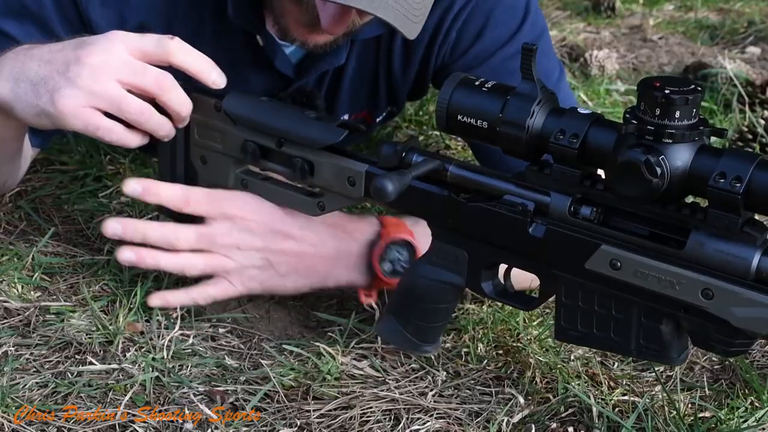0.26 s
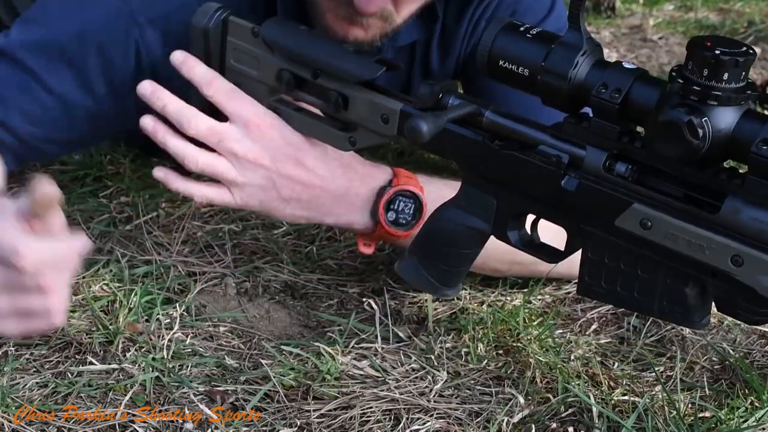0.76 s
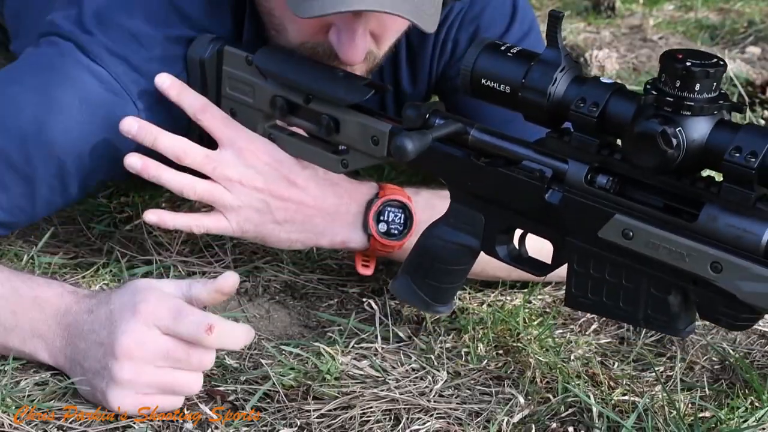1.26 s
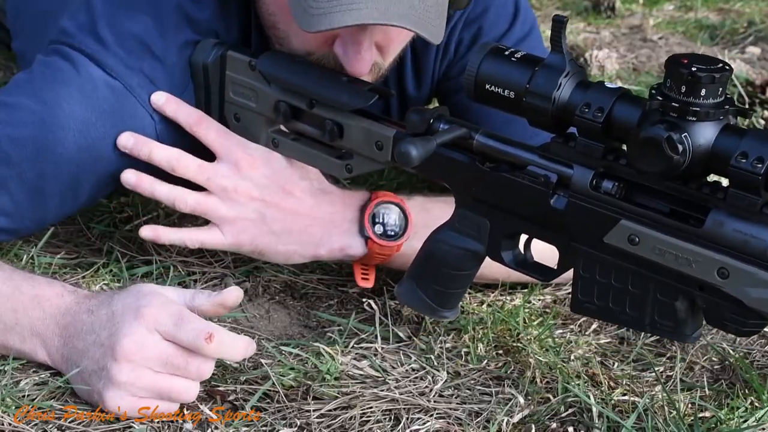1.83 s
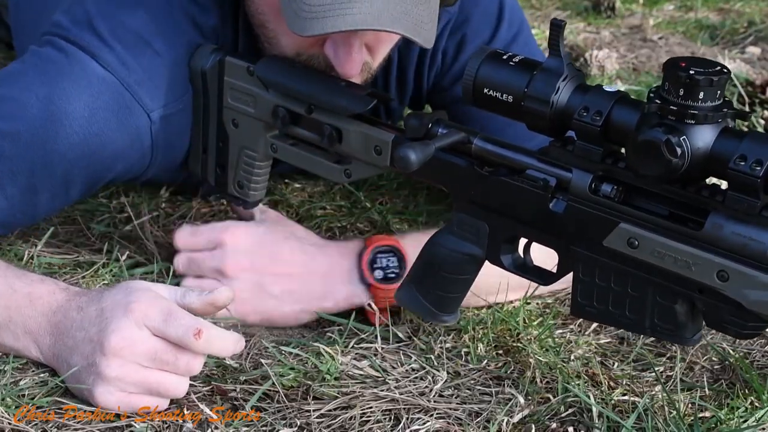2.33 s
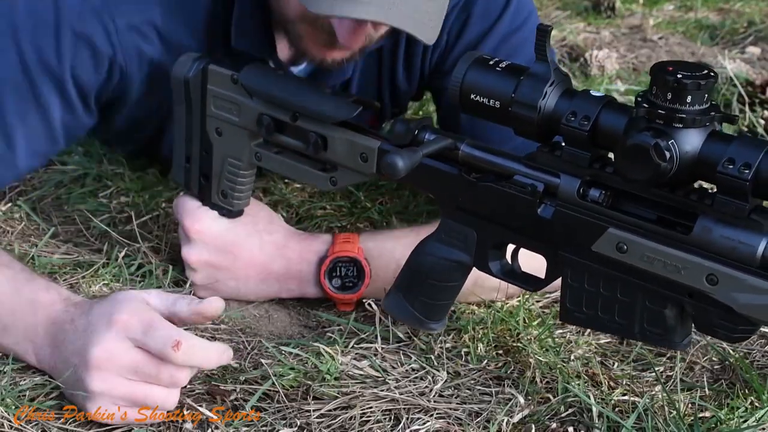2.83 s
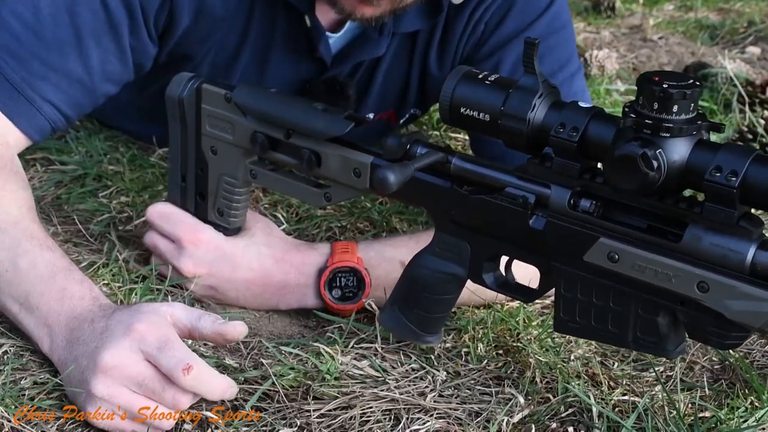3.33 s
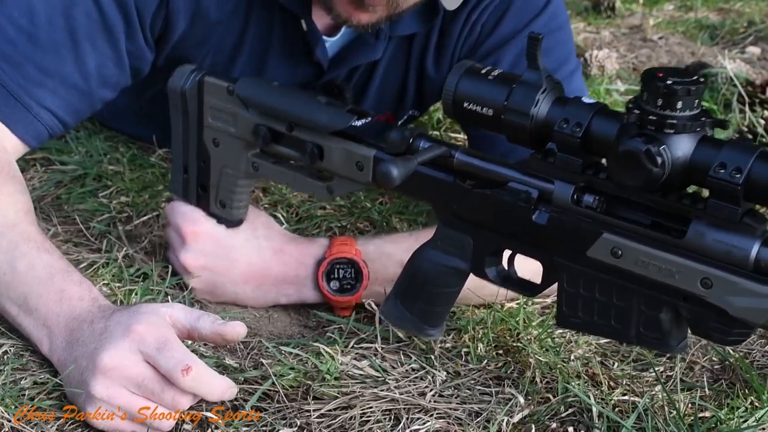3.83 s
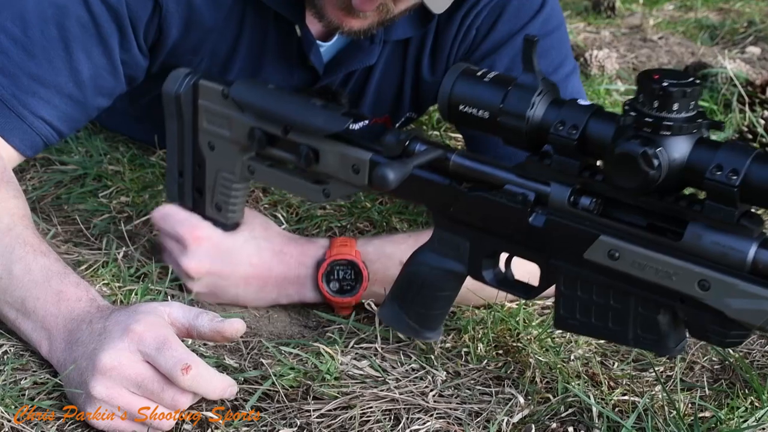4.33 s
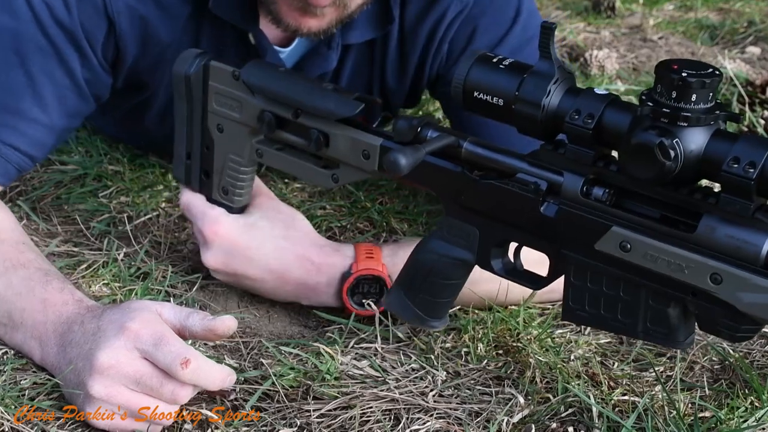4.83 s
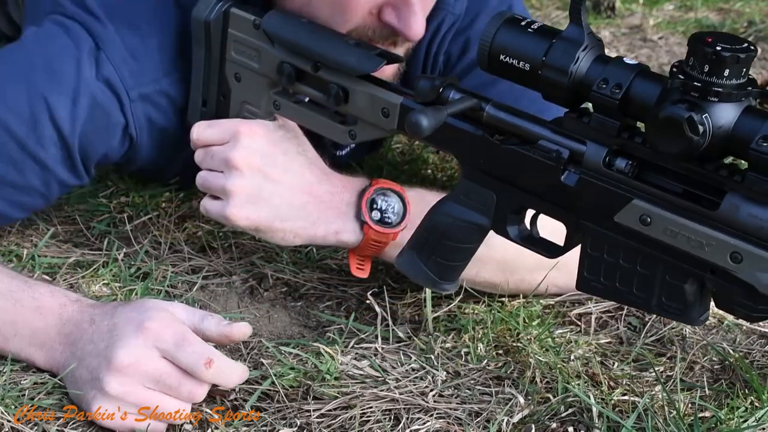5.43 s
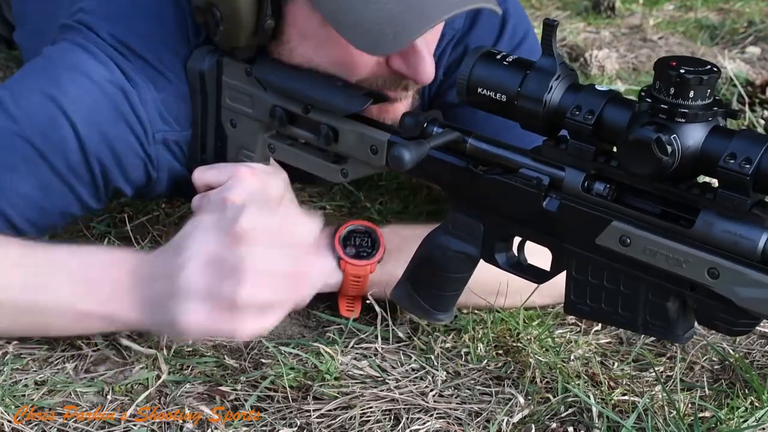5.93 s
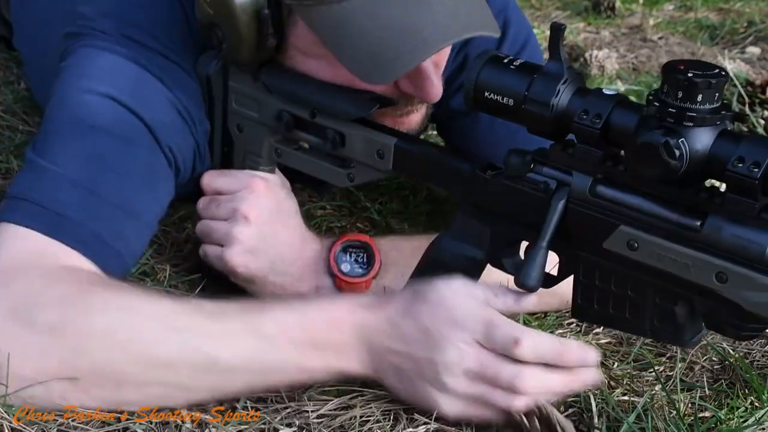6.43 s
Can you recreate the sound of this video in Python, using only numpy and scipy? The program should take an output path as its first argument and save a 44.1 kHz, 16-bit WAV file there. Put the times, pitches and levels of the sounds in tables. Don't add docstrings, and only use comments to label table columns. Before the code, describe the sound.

Faint cloth and dry-grass rustles with small ticks and soft thuds outdoors, then a rifle bolt is snapped back loudly and run forward to lock.

```python
import sys
import numpy as np
from scipy import signal
from scipy.io import wavfile
from scipy.ndimage import uniform_filter1d

SR = 44100
rng = np.random.default_rng(int(sys.argv[2]) if len(sys.argv) > 2 else 0)


def pcm_store(signal):
    levels = np.round(np.clip(np.atleast_2d(signal), -1, 1) * 32767)
    wavfile.write(sys.argv[1], SR, levels.astype(np.int16).T)


def invert_db(x):
    u = np.asarray(x, float) / 20
    return 10 ** u


N = 294147


def evened(x):
    return x / np.sqrt(np.mean(x ** 2) + 1e-20)


def peaked(x):
    return x / (abs(x).max() + 1e-20)


def add(mix, start_s, sound):
    part = mix[round(start_s * SR):][:len(sound)]
    part += sound[:len(part)]


def resonate(x, hz, width_hz):
    turn = np.exp(2j * np.pi * np.cumsum(hz * np.ones(len(x))) / SR)
    pole = np.exp(-np.pi * width_hz / SR)
    return 2 * (turn * signal.lfilter([1 - pole], [1, -pole], x / turn)).real


def resonate_twice(x, hz, width_hz):
    return resonate(resonate(x, hz, width_hz), hz, width_hz)


def ring(modes, t):
    return sum(invert_db(db - 60 * t / t60) * np.sin(2 * np.pi * hz * t) for hz, db, t60 in modes)


def air():
    # frequency in Hz, level in dB per Hz
    spectrum = [(15, -49), (25, 0), (64, 5.5), (185, -5.5), (293, -1.5), (405, -11), (936, -12.5),
                (2690, -25), (5000, -26.5), (14000, -38.5), (16000, -38.5)]
    hz = np.fft.rfftfreq(1024, 1 / SR)
    real, imaginary, patches = rng.standard_normal((N // 256 + 5, 513, 3)).T
    smooth = uniform_filter1d(uniform_filter1d(patches, 10, 0), 12, 1)
    patches_db = 1.2 * evened(smooth)
    point_hz, point_db = np.transpose(spectrum)
    shape_db = np.interp(np.log(hz + 1), np.log(point_hz + 1), point_db)[:, None]
    cells = (real + 1j * imaginary) * invert_db(shape_db + patches_db)
    return invert_db(-59) * evened(signal.istft(cells, nperseg=1024, noverlap=768)[1][:N])


def effort(start, hold, db):
    rise_db_per_s, fall_db_per_s = 286.5, 212
    t = np.arange(0, N, 64)[:, None] / SR
    before_db = rise_db_per_s * np.maximum(start - t, 0)
    after_db = fall_db_per_s * np.maximum(t - start - hold, 0)
    gain = np.linalg.norm(invert_db(db - before_db - after_db), axis=1)
    return np.repeat(gain, 64)[:N]


def movements():
    # start in seconds, hold in seconds, sleeve level in dB, body on soil in dB re sleeve
    shifts = [(0, 0.0224, -70, -6), (0.289, 0.044, -63.5, -3), (0.391, 0.043, -76, 18.5),
              (0.546, .08, -65, 9), (0.782, 0.056, -58, 3.5), (0.895, 0.111, -58, 1.5),
              (1.03, .08, -63, 3.5), (1.163, 0.0995, -59.5, -3), (1.381, 0.067, -65.5, 0.5),
              (1.555, 0.0254, -67, 5), (1.63, 0.084, -81, 19.5), (2.179, 0.105, -60, -4),
              (2.323, 0.2026, -61, 6.5), (2.656, 0.073, -59, 6), (2.837, 0.2315, -59.5, 0.5),
              (4.632, 0.0276, -59, 6), (4.756, 0.191, -65, 7), (4.975, 0.137, -62.5, 1),
              (5.155, 0.141, -56.5, -3), (5.397, 0.15, -64.5, -2), (5.597, 0.1084, -56.5, 3),
              (5.82, 0.0126, -57, 1), (5.9, 0.081, -59, 5), (5.99, 0.0676, -52, -1.5),
              (6.103, 0.113, -55.5, 5), (6.29, 0.064, -58.5, 5.5), (6.399, 0.0588, -56, 10),
              (6.482, 0.112, -58, 5.5), (6.62, .05, -63.5, 11)]
    # start in seconds, hold in seconds, straw level in dB, fine fibres in dB re straw
    strokes = [(0, 0.0206, -64, 1.5), (.24, 0.077, -57.5, -1.5), (0.505, 0.0091, -69, -4),
               (0.6, 0.0317, -57.5, -0.5), (0.787, 0.054, -62, 1), (0.899, 0.115, -71, 12),
               (1.033, 0.096, -67.5, 1.5), (1.175, .03, -62, -4), (1.379, .03, -71, 4),
               (1.564, 0.027, -67.5, 1), (2.189, 0.09, -59.5, -2), (2.326, 0.1796, -55.5, 2),
               (2.631, 0.0997, -59, 1.5), (2.839, .08, -64, 3), (2.965, 0.107, -58, -1),
               (4.602, .07, -61.5, -0.5), (4.729, 0.091, -60, -1.5), (4.849, 0.13, -60.5, -2),
               (5.036, 0.043, -59, 0), (5.155, 0.128, -62, 2.5), (5.345, 0.094, -73.5, 7),
               (5.604, 0.121, -66.5, 2), (5.889, 0.063, -65, 7), (6.0, 0.25, -65, 2),
               (6.29, 0.025, -57, -9), (6.402, 0.105, -58, -3.5), (6.549, .04, -66.5, 2.5),
               (6.62, 0.054, -69.5, 2.5)]
    # start in seconds, level in dB
    squeezes = [(3.2, -62), (3.371, -63), (3.515, -62.5), (3.686, -63), (3.885, -63), (4.025, -62),
                (4.155, -60.5), (4.315, -61.5), (4.42, -66)]
    # body, sleeve, straw, fibres in dB
    squeeze_mix_db = (1, -2.97, 0.43, -0.77)
    # body, sleeve, straw, fibres in dB
    rest_levels_db = (-74, -88.5, -76, -73.5)

    shift_s, shift_hold, sleeve_db, body_db = np.transpose(shifts)
    stroke_s, stroke_hold, straw_db, fibre_db = np.transpose(strokes)
    own = [effort(shift_s, shift_hold, sleeve_db + body_db),
           effort(shift_s, shift_hold, sleeve_db),
           effort(stroke_s, stroke_hold, straw_db),
           effort(stroke_s, stroke_hold, straw_db + fibre_db)]
    squeeze_s, squeeze_db = np.transpose(squeezes)
    knead = effort(squeeze_s, 0.0224, squeeze_db)
    return [np.sqrt(gain ** 2 + (invert_db(mix_db) * knead) ** 2 + invert_db(rest_db) ** 2)
            for gain, mix_db, rest_db in zip(own, squeeze_mix_db, rest_levels_db)]


def rustle():
    # centre in Hz, width in Hz, grains per second, spread of grain size in dB
    materials = [
        (264.4, 303, 700, 4.5),
        (1450, 1927, 1500, 3),
        (4800, 4410, 4150, 3.5),
        (9320, 8080, 5800, 3.5),
    ]
    out = np.zeros(N)
    for (hz, width, rate, spread_db), level in zip(materials, movements()):
        clumps = evened(uniform_filter1d(rng.standard_normal(N), size=700))
        size_db = spread_db * np.minimum(rng.exponential(1, N), 4) + 1.12 * clumps
        slips = invert_db(size_db) * (rng.random(N) < rate / SR)
        drive = evened(slips * rng.standard_normal(N)) + 0.902 * rng.standard_normal(N)
        out += level * evened(resonate_twice(drive, hz, width))
    return out


def ticks():
    # start in seconds, peak in dB, ring in Hz, snap in dB re ring
    small_ticks = [(0.162, -43, 2483, 4), (0.339, -40.5, 826, 4.5), (0.591, -40, 1407, -4.5),
                   (0.816, -32, 1770, 11), (0.847, -42, 1200, 0), (0.992, -43, 1270, -1),
                   (1.027, -41, 2604, 3), (1.054, -35, 1260, 13.5), (1.081, -42, 2366, -4.5),
                   (1.2, -40.5, 988, 4.5), (1.269, -41.5, 825, -11.5), (1.579, -42.5, 1970, 10.5),
                   (1.77, -44, 5620, 9), (2.16, -32, 1800, 2), (2.168, -39, 1830, 4.5),
                   (2.32, -40.5, 727, -3.5), (2.962, -29, 1796, 18),
                   (3.58, -45, 5800, 3), (3.924, -40, 5595, 7), (3.95, -44, 1390, 6.5),
                (4.066, -39, 1907, 12.5), (4.117, -44.5, 2814, 0.5), (4.129, -44.5, 1810, 8),
                (4.22, -38, 3445, 1), (4.245, -43.5, 1520, 9), (4.255, -42.5, 2660, 16),
                (4.329, -46, 956, 9.5), (4.409, -42, 2640, 5.5), (4.439, -44, 2050, 1.5),
                (4.469, -47.5, 2310, -2), (4.811, -35, 2066, 2), (4.811, -34, 600, -10.5),
                (5.275, -42.5, 3510, -3), (5.972, -40, 1430, -6.5), (6.108, -42, 1380, -6.5),
                (6.132, -32, 900, 0), (6.57, -43.5, 1550, -5)]
    t60 = 0.0137
    out, t = np.zeros(N), np.arange(2000) / SR
    snap_shape = invert_db(-60 * t / (0.594 * t60)) * (1 - np.exp(-t / 0.00057))
    dulling = signal.butter(2, 12000, fs=SR)
    for start_s, db, hz, snap_db in small_ticks:
        noise = rng.standard_normal(len(t))
        snap = peaked(resonate(noise * snap_shape, 5600, 5870))
        snap = signal.lfilter(*dulling, snap)
        tone = ring([(hz, 0, t60), (hz * 1.397, -12, t60 * 0.89)], t)
        add(out, start_s, invert_db(db) * peaked(invert_db(snap_db) * snap + tone))
    return out


def swishes():
    # start in seconds, level in dB, length in seconds, start pitch in Hz, end pitch in Hz
    thin = [(3.158, -63.5, 0.093, 4430, 4280), (3.338, -59.5, 0.0424, 4290, 4800),
            (3.487, -56.5, 0.069, 4800, 3760), (3.676, -59, 0.0465, 4200, 5000),
            (3.858, -55.5, 0.0506, 4360, 4080), (4.144, -56, 0.0478, 4340, 4600),
            (4.161, -58.5, 0.025, 6800, 7600), (4.241, -62.5, 0.026, 1550, 1650),
            (4.243, -62, 0.0258, 3020, 2800), (4.735, -58, 0.075, 4080, 3920),
            (4.817, -62.5, 0.073, 2100, 1950), (4.862, -52.5, 0.032, 3890, 5320),
            (4.887, -63, 0.067, 5340, 5400)]
    # start in
    # seconds, level in dB, length in seconds, start pitch in Hz, end pitch in Hz
    broad = [(0.273, -48, 0.0782, 4160, 3880), (3.951, -58, 0.0177, 1600, 2620),
             (3.996, -59.5, 0.033, 4200, 4800), (4.65, -47, 0.0139, 4080, 4500),
             (4.651, -46, 0.0121, 8500, 8500), (5.55, -53.5, 0.15, 1450, 1796),
             (6.463, -56.5, 0.043, 5000, 5500), (2.28, -60.5, .2, 800, 700), (4.721, -63.5, .2, 620, 680),
             (5.12, -61, .2, 650, 750), (6.194, -45.5, 0.032, 1700, 1900), (6.195, -48, 0.023, 3620, 3300),
             (6.269, -50, 0.048, 2310, 1800)]
    out = np.zeros(N)
    for rows, share in [(thin, 0.173), (broad, 0.514)]:
        for start_s, db, length_s, from_hz, to_hz in rows:
            progress = np.linspace(0, 1, round(length_s * SR))
            noise, roughness = rng.standard_normal((2, len(progress)))
            scratch = noise * invert_db(3.3 * roughness)
            hz = from_hz + (to_hz - from_hz) * progress
            friction = evened(resonate_twice(scratch, hz, share * from_hz))
            add(out, start_s, invert_db(db) * friction * np.sin(np.pi * progress))
    return out


def thuds():
    # start in seconds, peak in dB, pitch in Hz, 60 dB decay in seconds
    falls = [
        (0.8971, -37, 232, 0.085),
        (0.906, -29.5, 146, 0.05),
        (1.391, -47, 162, 0.097),
        (1.625, -43.5, 200, 0.041),
        (4.657, -45, 155, 0.103),
        (4.809, -38.5, 201, 0.029),
        (5.1305, -33, 172.7, 0.071),
        (6.598, -34.5, 322, 0.155),
    ]
    out, t = np.zeros(N), np.arange(6000) / SR
    for start_s, db, hz, t60 in falls:
        turns = np.cumsum(hz * (0.3723 + 1.467 * np.exp(-t / 0.00358))) / SR
        swell = 1 - np.exp(-t / 0.002)
        add(out, start_s, invert_db(db) * peaked(np.sin(2 * np.pi * turns) * invert_db(-60 * t / t60) * swell))
    return out


def bolt():
    # start in seconds, steel in dB, crack in dB, stock in dB, loudest ring in Hz
    blows = [(6.163, -28, -52.5, -41.5, 1900), (6.173, -22, -35.5, -22, 900),
             (6.228, -15, -17, -26.5, 9380), (6.2389, 6, 8.5, -5, 1450), (6.242, 1.5, -1.5, -13.5, 1650),
             (6.247, -4.5, -7.5, -24, 1724), (6.354, -25, -25.5, -36, 3657), (6.3724, -9, -4, -14, 2903),
             (6.3731, -8.5, -7.5, -21.5, 1531), (6.3733, -13, -31.5, -25.5, 3955),
             (6.5982, -26, -32, -38, 5596), (6.5993, -21.5, -44, -59, 1880)]
    # start in seconds, steel in dB, crack in dB, stock in dB, loudest ring in Hz
    catches = [
        (6.186, -28, -31.5, -32.5, 1804),
        (6.196, -29.5, -31.5, -30, 1300),
        (6.2203, -13.5, -12.5, -13.5, 2770),
        (6.2306, -8.5, -9.5, -20.5, 1568),
        (6.288, -43, -42, -37.5, 1790),
    ]
    # frequency in Hz, level in dB
    steel_modes = [(1400, 3), (1730, 3), (2050, -1.5), (2850, -1.5), (3350, -2), (3750, -7.5), (4200, -9.5),
                   (5550, -6), (6400, -7.5), (7300, 0.5)]
    # frequency in Hz, level in dB, 60 dB decay in seconds
    stock_modes = [(135.8, -7.5, 0.0994), (271.4, -20, 0.11), (384.7, -10, 0.0783), (450.2, -7, 0.17),
                   (600, -1, 0.03), (697.2, 6, 0.0319), (931.5, 7, 0.01816), (1167.3, -1.5, 0.0202)]
    out, t = np.zeros(N), np.arange(9000) / SR
    stock = peaked(ring(stock_modes, t) * (1 - np.exp(-t / 0.0012)))
    for rows, t60 in [(blows, 0.01115), (catches, 0.0223)]:
        grip = invert_db(-60 * (t / t60) ** 1.069) * (1 - np.exp(-t / 0.000876))
        for start_s, steel_db, crack_db, stock_db, ring_hz in rows:
            steel = np.zeros(len(t))
            for hz, db in steel_modes + [(ring_hz, 7.5)]:
                chance = rng.standard_normal()
                struck_hz = hz * (1 + 0.0279 * chance)
                steel += invert_db(db) * np.sin(2 * np.pi * struck_hz * t + 2.976 * chance)
            steel *= grip + invert_db(-35.5 - 60 * t / 0.022)
            crack = resonate_twice(rng.standard_normal(len(t)), 5800, 8300) * grip
            blow = invert_db(steel_db) * peaked(steel) + invert_db(crack_db) * peaked(crack) + invert_db(stock_db) * stock
            add(out, start_s, blow)
    return signal.lfilter(*signal.butter(2, [70, 11500], "band", fs=SR), out)


def ground(x):
    t = np.arange(9000) / SR
    dull = signal.lfilter([1], [1, -.55], rng.standard_normal(len(t)))
    wash = dull * invert_db(-60 * t / 0.0815)
    return signal.fftconvolve(x, wash / np.linalg.norm(wash))[:N]


def scene():
    hits = bolt() + ticks()
    mono = air() + rustle() + swishes() + thuds() + hits + invert_db(-22) * ground(hits)
    return np.array([mono, mono])


def low_pass(x):
    return signal.sosfilt(signal.butter(12, 16360, fs=SR, output="sos"), x)


def record(dry):
    white = rng.standard_normal((2, N))
    hiss = white + 0.0472 * signal.lfilter([1], [1, -.95], white)
    clipped = np.clip(dry + invert_db(-60) * hiss, -1, 1)
    coupled = signal.lfilter(*signal.butter(2, 32, "high", fs=SR), clipped)
    limited = signal.oaconvolve(coupled, signal.firwin(255, 15900, fs=SR)[None], "same")
    return low_pass(limited)


dry = scene()
out = record(dry)
pcm_store(out)
```